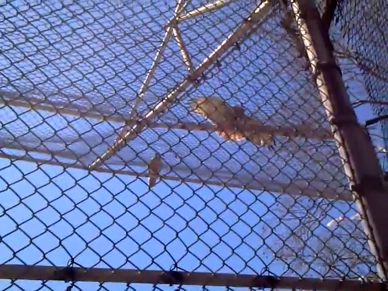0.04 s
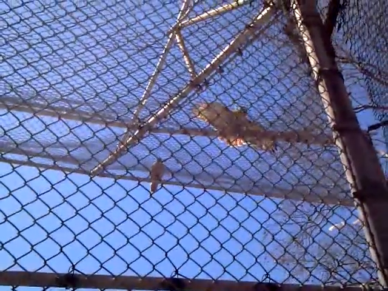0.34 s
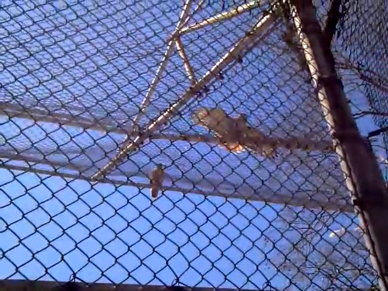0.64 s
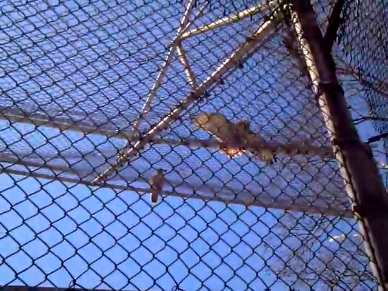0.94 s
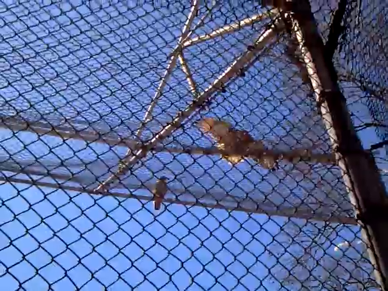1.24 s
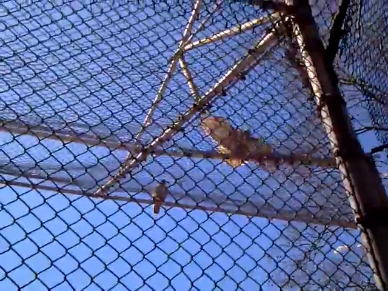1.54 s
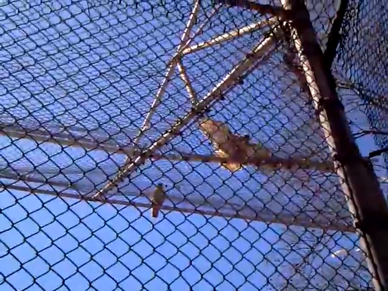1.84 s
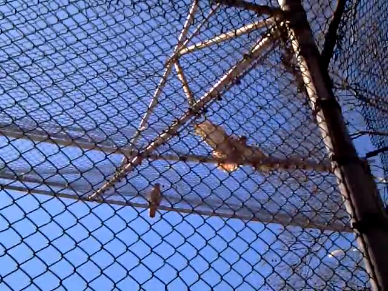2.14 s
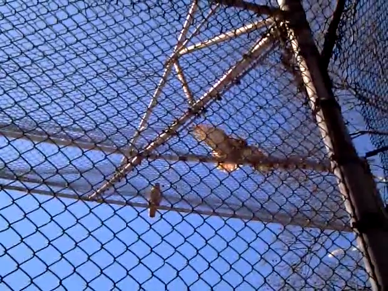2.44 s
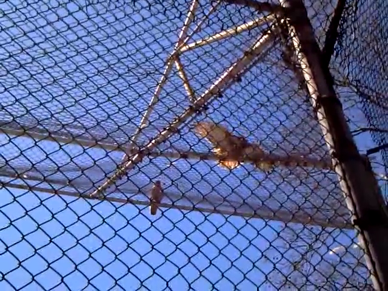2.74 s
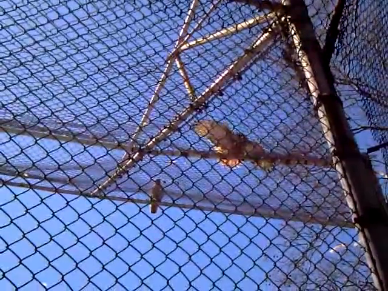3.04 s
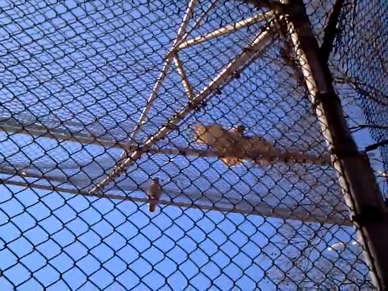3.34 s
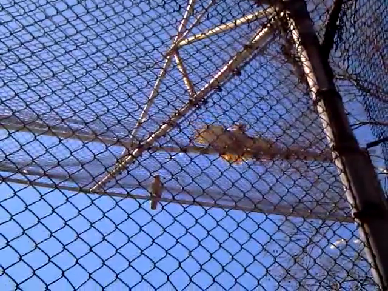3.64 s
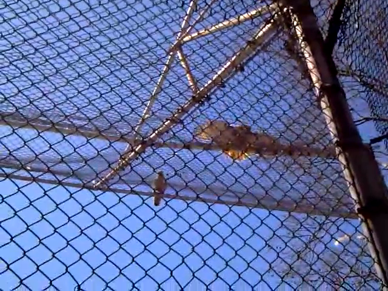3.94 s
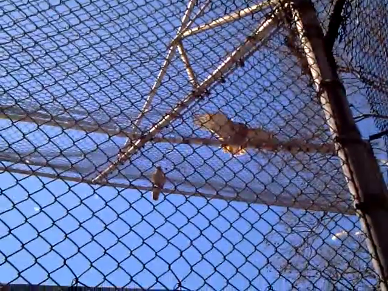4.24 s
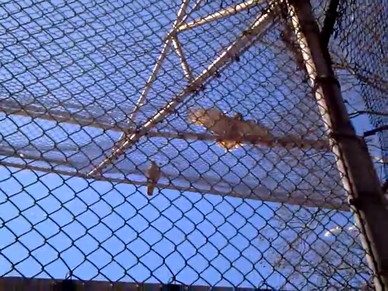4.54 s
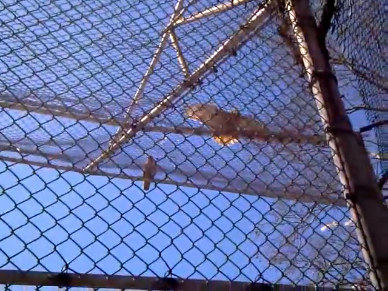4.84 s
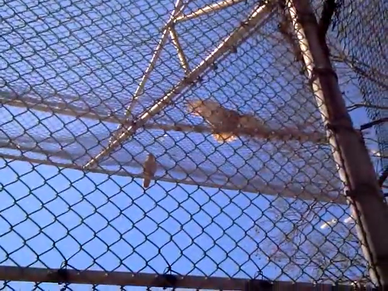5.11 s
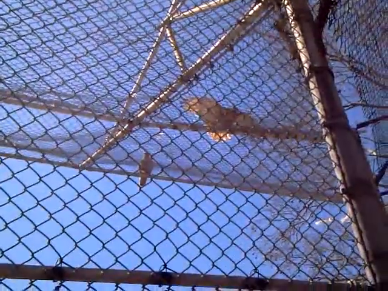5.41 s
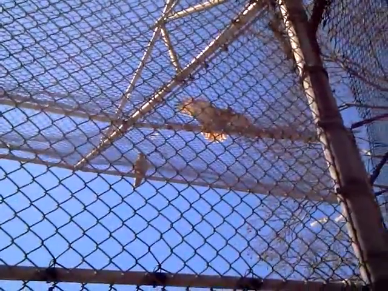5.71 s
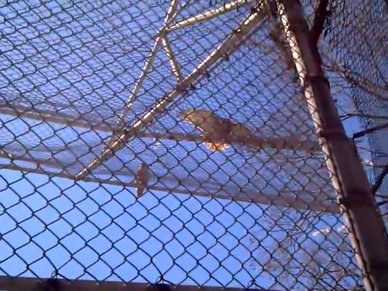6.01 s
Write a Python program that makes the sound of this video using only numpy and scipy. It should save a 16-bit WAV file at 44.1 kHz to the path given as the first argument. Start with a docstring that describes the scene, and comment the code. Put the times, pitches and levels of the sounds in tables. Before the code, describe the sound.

Wind buffets a small, dull-sounding microphone throughout, in irregular low gusts with sharp thumps and pops. A faint wash of far traffic lies underneath. At about 0.5 seconds a hawk, some way off in an outdoor aviary, gives a thin, high, wavering whistle, much quieter than the gusts. A brief call follows near 1.8 seconds, and a second wavering whistle runs from 2.4 to 2.9. The wind thumps harder from about 2.9 to 4.3 seconds. Short whistles that rise and fall come at 3.6, 4.2 and 4.6 seconds, with a slight echo. Very faint chirps from distant birds are scattered along the way, and the wire mesh rattles lightly between 1 and 2.3 seconds and again around 5.4. From 5.6 seconds to the end, just past 6, the strongest gusts pound the microphone and overload it with a slight crackle.

```python
"""Wind gusts buffet a small camera's bare microphone; the sharpest eddies thump and overload it.
Over a wash of far traffic, distant birds chirp faintly and a hawk whistles thin, gliding calls,
each a nearly pure tone, in an outdoor wire-mesh aviary with light rattles and a thin echo.
The camera takes sound at a telephone rate, so only the overload crackle reaches the treble."""
import sys
import numpy as np
from scipy import signal
from scipy.fft import rfft, irfft, next_fast_len
from scipy.io import wavfile
from scipy.ndimage import uniform_filter1d

SR = 44100
rng = np.random.default_rng(int(sys.argv[2]) if len(sys.argv) > 2 else 0)


def generate_wav(sig):
    """Save sig (samples, or channels by samples) to the path in sys.argv[1] as 16-bit PCM at SR."""
    pcm = np.round(np.clip(np.atleast_2d(sig).T, -1, 1) * 32767).astype(np.int16)
    wavfile.write(sys.argv[1], SR, pcm)


N = 276507
T = np.arange(N) / SR
HZ = np.fft.rfftfreq(N, 1 / SR)


def amp(db):
    """Decibels to gain."""
    return 10 ** (np.asarray(db) / 20)


def unit_rms(x):
    """Scale to unit rms."""
    return x / np.sqrt(np.mean(x ** 2) + 1e-20)


def spectrum(points):
    """Interpolate (Hz, value) points over log frequency."""
    hz, value = np.transpose(points)
    return np.interp(np.log(HZ + 1), np.log(hz), value)


def noise(gain):
    """Unit-rms noise with the given spectrum."""
    size = next_fast_len(N, True)
    shape = np.interp(np.fft.rfftfreq(size, 1 / SR), HZ, gain)
    return unit_rms(irfft(rfft(rng.standard_normal(size)) * shape, size)[:N])


def wobble(rate_hz):
    """Smooth random drift up to about rate_hz."""
    return noise(np.exp(-(HZ / rate_hz) ** 2))


def low_pass(x, hz, taps):
    """Windowed-sinc low-pass."""
    return signal.oaconvolve(x, signal.firwin(taps, hz, window="blackman", fs=SR), "same")


def add(mix, start_s, sound):
    """Mix a sound in at start_s."""
    part = mix[round(start_s * SR):][:len(sound)]
    part += sound[:len(part)]


# gusts: (time [s], flow [dB], build [s], fade [s], eddy peak [dB], eddy half length [ms])
GUSTS = [(.002, -18, .01, 0.013, -19, 0.41), (0.168, -16.5, .008, 0.031, -10, 0.68),
         (0.221, -23, 0.024, 0.027, -13, 1.1), (.35, -16, 0.017, 0.032, -8, 1.05),
         (.403, -26, 0.036, 0.024, -2.5, 0.88), (0.756, -17.5, 0.019, 0.093, -5.5, 0.61),
         (.883, -22, 0.013, 0.011, -5.5, 0.49), (0.93, -20.5, 0.023, 0.01, -9, 0.47),
         (.992, -22, 0.017, 0.017, -4, 0.88), (1.07, -21, 0.0069, 0.013, -28, 1.2),
         (1.287, -15, 0.027, .018, -6, 0.88), (1.459, -25, 0.057, 0.017, -11.5, 1.64),
         (1.579, -22, 0.03, 0.17, -10.5, 0.79), (1.772, -27.5, 0.013, 0.034, -17, 1.1),
         (1.895, -31.5, 0.014, 0.041, -14, 0.78), (1.974, -16, 0.0075, 0.03, -13.5, 0.68),
         (2.136, -25, 0.012, 0.034, -30, 0.66), (2.424, -19.5, 0.0026, 0.0031, -19.5, .8),
         (2.596, -24.5, 0.022, 0.022, -5.5, 0.74), (2.704, -18, 0.0097, 0.027, -10, 0.97),
         (2.879, -13, 0.014, 0.014, -4, 0.74), (2.922, -15.5, 0.015, 0.027, 1.5, 0.92),
         (3.075, -16.5, 0.034, 0.033, -7.5, 0.62), (3.112, -12.5, 0.019, 0.011, -1, .65),
         (3.143, -25, .01, .014, -1, 0.69), (3.174, -9, 0.035, 0.014, 0, 0.86),
         (3.25, -13, 0.014, 0.016, -4, 0.53), (3.276, -14.5, 0.017, 0.039, -6, 1.3),
         (3.358, -24, 0.021, 0.019, -15, 0.83), (3.421, -18, 0.0082, 0.0056, -14.5, 1),
         (3.572, -21.5, .007, 0.01, -42, 1), (3.882, -22, 0.012, .008, -6, 0.6),
         (3.897, -19, 0.0058, .055, -6.5, 0.66), (4.002, -13, 0.0079, 0.024, -3.5, 0.67),
         (4.031, -13.5, .012, 0.042, -5, .6), (4.075, -18, .014, .032, -2.5, .92),
         (4.193, -9.5, 0.0052, .017, -1, 0.58), (4.233, -11.5, 0.013, 0.013, -3.5, 0.79),
         (4.332, -21, 0.037, .03, -5.5, 0.91), (4.397, -16.5, 0.012, 0.0083, -23, 0.76),
         (4.472, -25, 0.032, 0.029, -10.5, 0.59), (4.585, -20, 0.0054, 0.006, -6, .9),
         (4.668, -20.5, 0.048, 0.02, -8, 0.7), (4.881, -19, 0.005, 0.0074, -13.5, 0.52),
         (4.911, -15, 0.0042, 0.011, -11.5, 1.15), (4.989, -28.5, 0.041, .018, -14.5, 0.96),
         (5.162, -24, 0.015, 0.02, -12.5, 0.88), (5.194, -21.5, 0.015, 0.082, -10, 1.3),
         (5.293, -19, 0.0076, 0.0066, -11.5, 0.87), (5.425, -23, 0.021, 0.047, -15, 0.79),
         (5.543, -24.5, 0.009, 0.033, -16, 0.64), (5.633, -11, 0.014, .014, -4.5, 0.56),
         (5.665, -13.5, 0.0069, .009, -6, 0.73), (5.708, -4.5, 0.0074, 0.006, -5.5, 0.47),
         (5.731, 0, 0.0065, 0.018, 2, 0.76), (5.769, -14.5, 0.0032, 0.013, -1, 0.55),
         (5.844, -6.5, .011, 0.016, -2.5, 0.5), (5.897, -9, 0.0032, .016, -8, 0.46),
         (5.926, -9, .008, 0.0086, 0, 0.62), (5.955, -1, 0.025, .045, 3.5, 1),
         (6.009, -16, .005, .008, 1.5, 1.04), (6.025, -15, 0.0089, .013, 2.5, 0.92),
         (6.096, -5.5, 0.015, 0.011, 0, 0.86), (6.138, 5.5, 0.0047, .036, 1.5, 1.15),
         (6.214, -20, 0.016, .006, -1, 0.69), (6.229, 0, 0.0032, 0.018, 4, 0.94)]


def airflow(lull_db=-43, swing_db=7.5, stir_hz=8.8):
    """Flow in dB: each gust builds and dies away over a restless breeze."""
    power = amp(lull_db + swing_db * np.tanh(wobble(stir_hz))) ** 2
    for time_s, db, build_s, fade_s, *_ in GUSTS:
        on = (T > time_s - 4 * build_s) & (T < time_s + 4 * fade_s)
        t = T[on] - time_s
        power[on] += amp(db) ** 2 * np.exp(-(t / np.where(t < 0, build_s, fade_s)) ** 2)
    return 10 * np.log10(power)


def eddies(flow_db, stray_per_s=48, stray_db=1, stray_half_ms=0.88):
    """One sharp eddy per gust, plus strays that grow denser and harder with the flow."""
    capped_db = np.minimum(flow_db, 0)
    rate_per_s = stray_per_s * amp(0.96 * capped_db)
    hits = np.flatnonzero(rng.random(N) < rate_per_s / SR)
    halves_ms = stray_half_ms * np.exp(0.18 * rng.standard_normal(N))
    strays = [(T[i], stray_db + 0.97 * capped_db[i], halves_ms[i]) for i in hits]
    return strays + [(time_s, db, half_ms) for time_s, *_, db, half_ms in GUSTS]


# turbulence by eddy size: (centre [Hz], level at 0 dB drive [dB], growth with drive [dB/dB])
TURBULENCE = [(25.3, -23, 0.55), (64.4, -22.5, 0.41), (116, -8.5, 0.7852), (230.8, -4, 1.1362),
              (505, -2.5, 1.87), (889, -3, 3), (1470, -48, 0.7), (2960, -38.5, 2.3)]


def wind(flow_db, lump_db=3.5, kick_db=2.5, choke_db=-7, knee_db=3, steadiness=0.79):
    """Turbulence at the microphone port: stronger gusts break into smaller eddies and sound brighter."""
    gust_db = flow_db + lump_db * wobble(63) + kick_db * wobble(290)
    # the narrow port limits the flow
    port_db = choke_db - knee_db * np.logaddexp(0, (choke_db - gust_db) / knee_db)
    centres_hz = [row[0] for row in TURBULENCE]
    out = np.zeros(N)
    for (hz, db, growth), weights in zip(TURBULENCE, np.eye(len(centres_hz))):
        shape = np.sqrt(spectrum(list(zip(centres_hz, weights))))
        band = noise(shape * HZ / np.hypot(HZ, 22) / (1 + (HZ / 4000) ** 4))
        # eddies of one size carry nearly steady energy
        energy = abs(uniform_filter1d(band ** 2, size=1100 + int(SR / hz))) + 1e-6
        steady = unit_rms(band / energy ** (steadiness / 2))
        # large eddies follow the flow slowly
        drive_db = uniform_filter1d(port_db, size=int(SR / hz / 2) + 1)
        out += steady * amp(db + growth * drive_db)
    return out


def thumps(turbulence, strikes, sweep=0.71, reach=1.79):
    """A large eddy sweeps the small ones aside, pushes on the diaphragm, then sucks."""
    out = turbulence.copy()
    for time_s, db, half_ms in strikes:
        on = slice(max(int((time_s - .02) * SR), 0), int((time_s + .02) * SR))
        u = (T[on] - time_s) * 1000 / half_ms
        swing = -np.sqrt(27 / 4) * u / np.sqrt(1 + u * u) ** 3  # unit peak
        swept = sweep * np.exp(-(u / reach) ** 2) * out[on]
        out[on] += amp(db) * swing * np.hanning(len(u)) - swept
    return out


# wash spectrum: (frequency [Hz], relative density [dB])
WASH_SPECTRUM = [(20, 14.5), (120, 12), (280, 1.5), (550, 5), (950, 1.5), (1400, -4), (2200, -9),
                 (3000, -11), (3500, -6), (4000, -22)]
# wash loudness: (time [s], level [dB])
WASH_LEVEL = [(0, -46), (1.1, -43.5), (1.4, -46.5), (2.65, -43.5), (2.9, -46), (4.24, -46.5), (4.43, -43.5),
              (5.6, -47.5), (6.27, -42)]


def wash(swell_db=2.03, swell_hz=8.5):
    """Far traffic and moving air."""
    hiss = noise(amp(spectrum(WASH_SPECTRUM)))
    level_db = np.interp(T, *np.transpose(WASH_LEVEL)) + swell_db * wobble(swell_hz)
    return hiss * amp(level_db)


def whistle(t, hz, db, jitter=0.0083, flutter_db=2.0, attack_s=0.033, release_s=0.018):
    """A bird's nearly pure tone, gliding and trembling slightly."""
    def drift(rate_hz):
        smooth = uniform_filter1d(rng.standard_normal(SR), size=int(SR / rate_hz / 3) + 1)
        return unit_rms(smooth)[:len(t)]

    pitch_hz = uniform_filter1d(hz, size=700, mode="nearest") * (1 + jitter * drift(rate_hz=240))
    gate = np.clip(t / attack_s, 0, 1) * np.clip((t[-1] - t) / release_s, 0, 1)
    level = amp(db + flutter_db * drift(rate_hz=110)) * np.sin(np.pi / 2 * gate) ** 2
    return np.sqrt(2) * level * np.sin(2 * np.pi * np.cumsum(pitch_hz) / SR)


# distant chirps: (start [s], length [s], first pitch [Hz], last pitch [Hz], level [dB])
CHIRPS = [(0.165, 0.045, 2290, 2220, -53), (1.664, .075, 2940, 2980, -61), (3.542, 0.2, 3480, 3740, -60),
          (3.966, 0.059, 2930, 2860, -53), (4.55, .04, 2680, 2570, -55), (4.924, 0.055, 2520, 2340, -61.5),
          (5.288, 0.12, 3740, 2460, -59)]


def distant_birds():
    """Faint slurs, one glide each."""
    out = np.zeros(N)
    for start_s, length_s, first_hz, last_hz, db in CHIRPS:
        t = np.arange(0, length_s, 1 / SR)
        glide_hz = np.geomspace(first_hz, last_hz, len(t))
        add(out, start_s, whistle(t, glide_hz, db, jitter=.014, flutter_db=1.0))
    return out


# long hawk calls, one curve each: (time [s], pitch [Hz], level [dB])
WAVERING_CALLS = [
    [(.488, 2950, -41), (.525, 3410, -37.5), (.555, 3520, -42), (.625, 3830, -42), (.665, 4260, -63),
     (.703, 3710, -39), (.731, 3670, -38), (.792, 3960, -46.5), (.837, 2970, -36)],
    [(2.405, 3050, -52), (2.49, 3275, -45), (2.535, 3130, -51), (2.592, 3160, -50), (2.627, 3610, -40.5),
     (2.675, 4200, -58), (2.711, 3880, -43), (2.731, 3380, -37.5), (2.755, 3030, -50.5)],
]


def hawk_wavering():
    """Two long whistles that waver in pitch and level."""
    out = np.zeros(N)
    for curve in WAVERING_CALLS:
        times_s, hz, db = np.transpose(curve)
        turns_s = times_s - times_s[0]
        t = np.arange(0, turns_s[-1], 1 / SR)
        add(out, times_s[0], whistle(t, np.interp(t, turns_s, hz), np.interp(t, turns_s, db)))
    return out


# aviary rattles: (start [s], level [dB], centre [Hz], decay [s])
RATTLES = [(1.072, -40.5, 1860, 0.016), (1.238, -36, 3660, 0.0041), (1.58, -43, 2400, 0.0054),
           (1.667, -51, 3550, 0.009), (2.247, -46, 1950, 0.033), (5.289, -43, 3180, 0.0056),
           (5.528, -42, 1850, 0.027)]


def rattles(log_spread=0.22):
    """Light rattles: band-passed noise bursts that die away quickly."""
    out, hiss = np.zeros(N), rng.standard_normal(N)
    for start_s, db, hz, decay_s in RATTLES:
        on = (T >= start_s) & (T < start_s + .2)
        band = signal.butter(2, [hz * np.exp(-log_spread), hz * np.exp(log_spread)], "band", fs=SR)
        burst = unit_rms(signal.lfilter(*band, hiss[on]))
        out[on] += amp(db) * burst * np.exp(-(T[on] - start_s) / decay_s)
    return out


# short hawk calls: (start [s], length [s], top pitch [Hz], level [dB])
ARCHED_CALLS = [(1.752, .09, 3090, -49), (2.746, 0.12, 3890, -41.5), (3.601, 0.18, 3910, -40),
                (4.192, .175, 3864, -38), (4.612, 0.15, 3400, -40)]


def hawk_arches(rest_hz=3000, scoop_hz=233, end_hz=2943, scoop_s=0.026, hold_s=0.02, fall_s=0.04):
    """Whistles that scoop up from the relaxed pitch, climb, hold and fall back."""
    out = np.zeros(N)
    for start_s, length_s, top_hz, db in ARCHED_CALLS:
        t = np.arange(0, length_s, 1 / SR)
        turns_s = [0, scoop_s, length_s - fall_s - hold_s, length_s - fall_s, length_s]
        turns_hz = [rest_hz, min(rest_hz + scoop_hz, top_hz), top_hz, top_hz, end_hz]
        add(out, start_s, whistle(t, np.interp(t, turns_s, turns_hz), db))
    return out


def aviary(x, wet_db=-18, t60_s=0.41, echoes_per_s=1500, gap_s=0.006):
    """Posts, ground and trees scatter a thin echo, which blurs into hiss."""
    t = T[:SR]
    taps = rng.standard_normal(SR) * (rng.random(SR) < echoes_per_s / SR)
    taps *= amp(-60 * t / t60_s) * (t > gap_s)
    echo = signal.oaconvolve(x, taps / np.linalg.norm(taps))[:N]
    return x + amp(wet_db) * echo * wobble(rate_hz=300)


def scene():
    """Wind right on the microphone; wash, birds and rattles at a distance."""
    flow_db = airflow()
    buffeting = thumps(wind(flow_db), eddies(flow_db))
    background = wash()
    distant = aviary(rattles() + hawk_arches() + hawk_wavering() + distant_birds())
    return (buffeting + background + distant)[None]


# rasp of the overloaded converter: (frequency [Hz], relative density [dB])
RASP_SPECTRUM = [(2500, -3.5), (3700, 1.5), (4400, 1), (5400, -13.5), (6800, -17.5), (8000, -2),
                 (9500, -25.5), (15000, -27.5)]


def record(dry, clock_hz=8000, corner_hz=3720, ceiling=0.66, onset=0.89, ripple=0.033, rasp_gain=0.039):
    """Narrow-band camera: tones near its limit are mirrored; overloaded peaks flatten and rasp."""
    clock = np.cos(2 * np.pi * clock_hz * T)
    sampled = low_pass(dry[0], clock_hz / 2, taps=601) * (1 + 2 * clock)
    narrow = low_pass(sampled, corner_hz, taps=151)
    clipped = narrow / (1 + (narrow / ceiling) ** 20) ** (1 / 20)
    # flat tops flutter at the clock rate and rasp around half of it
    overload = np.clip((abs(narrow) / ceiling - onset) * 10, 0, 1)
    flutter = ripple * overload * (1 + clock) / 2
    rasp = rasp_gain * uniform_filter1d(overload, size=64) * noise(amp(spectrum(RASP_SPECTRUM)))
    return low_pass(clipped * (1 - flutter) + rasp, hz=15900, taps=511)[None]


dry = scene()
out = record(dry)
generate_wav(out)
```